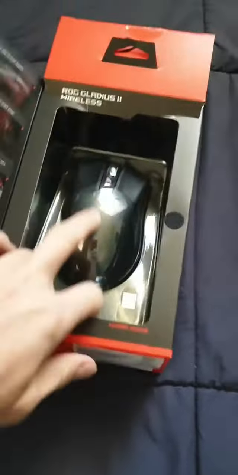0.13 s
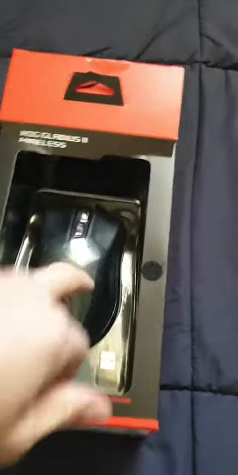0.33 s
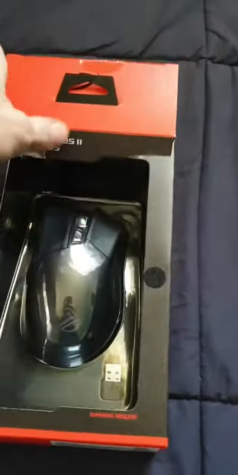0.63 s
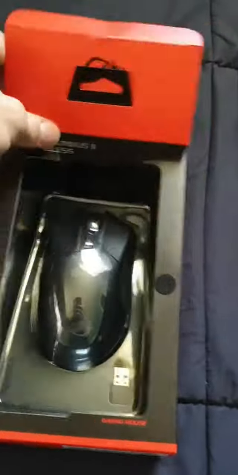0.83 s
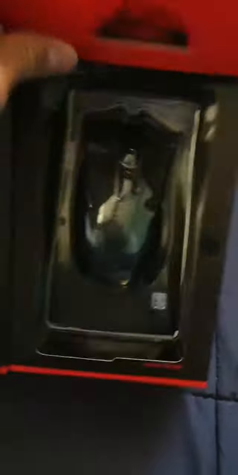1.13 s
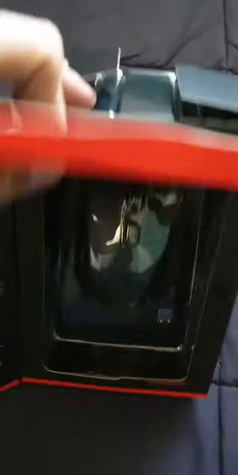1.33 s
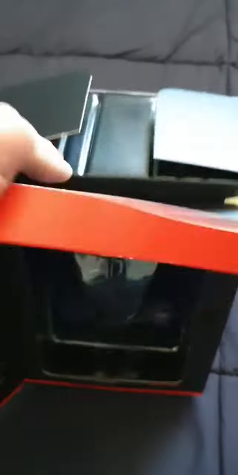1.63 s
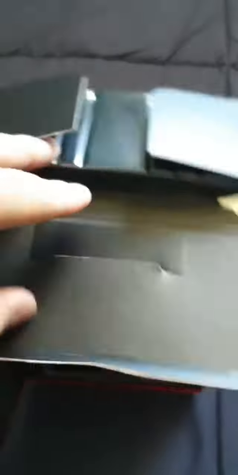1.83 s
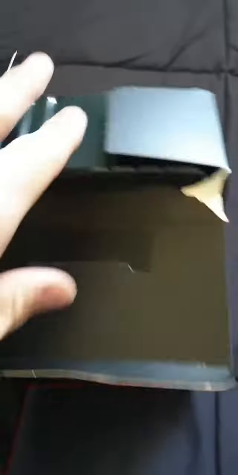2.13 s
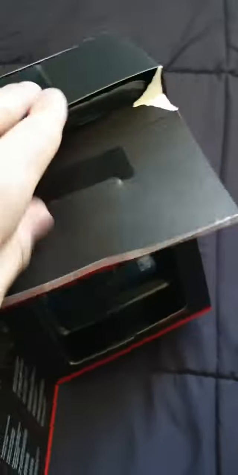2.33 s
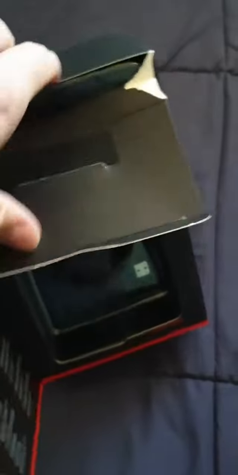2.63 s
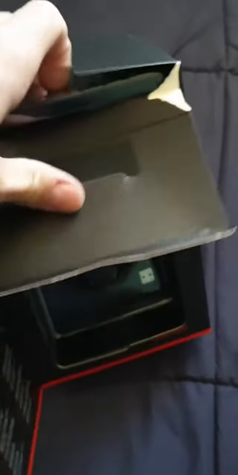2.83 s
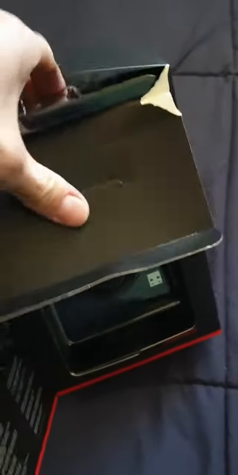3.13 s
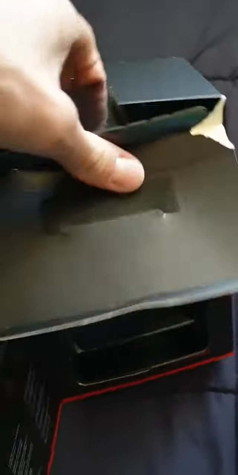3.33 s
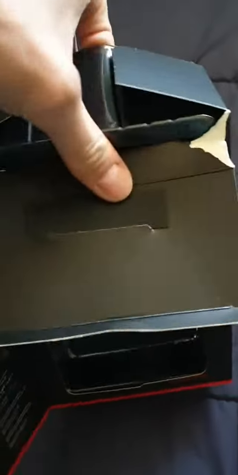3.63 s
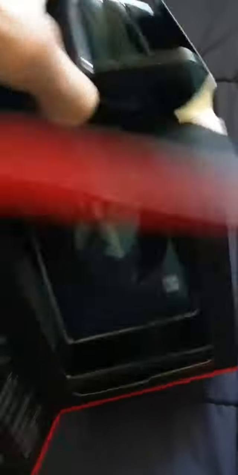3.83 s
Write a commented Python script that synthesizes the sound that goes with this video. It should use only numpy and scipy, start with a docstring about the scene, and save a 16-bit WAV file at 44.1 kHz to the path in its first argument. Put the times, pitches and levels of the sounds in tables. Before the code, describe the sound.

Cardboard box being opened by hand, with papery scrapes, hollow knocks and sharp crackling snaps

```python
"""Opening a small cardboard box

A hand opens a small cardboard box on a quilt, close to a phone with two spaced microphones.
Fingers and flaps scrape the card: random stick-slip grains, filtered to a hollow rasp and a papery hiss.
Flap edges and a plastic tray crack in flurries of snaps, over duller ticks of fingertips and card edges.
Knocks ring the modes of the hollow box, its big panels thump, and it rumbles as it shifts on the quilt.
A small soft room rings briefly, over a faint hiss of quiet room and microphones."""
import sys
import numpy as np
from scipy import signal
from scipy.fft import rfft, irfft
from scipy.io import wavfile
from scipy.ndimage import uniform_filter1d

SR = 44100
rng = np.random.default_rng(int(sys.argv[2]) if len(sys.argv) > 2 else 0)


def pcm_store(signal):
    """Save signal as 16-bit PCM."""
    levels = np.round(np.clip(np.atleast_2d(signal), -1, 1) * 32767)
    wavfile.write(sys.argv[1], SR, levels.astype(np.int16).T)


def boost(x):
    """Linear amplitude factor 10**(x/20) for a level x in decibels (scalar or array-like)."""
    u = np.asarray(x, float) / 20
    return 10 ** u


N = 176400  # samples in the scene


def unit(x):
    """Normalisation: scales a signal to an rms of 1."""
    return x / np.sqrt(np.mean(x ** 2))


def unit_energy(x):
    """Normalisation: scales a signal to a total energy of 1."""
    return x / np.linalg.norm(x)


def shape(table, size):
    """Spectral interpolation: gain at each FFT bin, linear in dB over log frequency."""
    hz, db = np.array(table, float).T
    bins_hz = np.fft.rfftfreq(size, 1 / SR)
    return boost(np.interp(np.log(bins_hz + 1), np.log(hz + 1), db))


def colour(x, table):
    """Minimum-phase filtering: folding the cepstrum makes a causal filter of the given spectrum."""
    cepstrum = irfft(np.log(shape(table, size=8192)))
    cepstrum[1:4096] *= 2
    cepstrum[4097:] = 0
    response = irfft(np.exp(rfft(cepstrum)))
    return signal.fftconvolve(x, response)[:N]


def band(x, lo_hz, hi_hz):
    """Band-pass filtering: a Butterworth filter keeps the range between two cutoffs."""
    edges = [lo_hz, min(hi_hz, .45 * SR)]
    return signal.sosfilt(signal.butter(2, edges, "band", fs=SR, output="sos"), x)


def walk(rate):
    """Sample and hold: random levels held 1 / rate s and slewed; spread near 1."""
    hold = int(SR / rate)
    steps = np.repeat(rng.standard_normal(N // hold + 1), hold)
    return uniform_filter1d(steps, hold // 2 + 1)[:N]


def add(out, s, x):
    """Superposition: mixes a sound in at s seconds."""
    i = int(s * SR)
    out[i:i + len(x)] += x[:N - i]


def stick_slip(grains_per_s, size_db, uneven, slip, spectrum):
    """Stick-slip friction: random impulses of uneven size, stepped in level, excite a filter; rms 1."""
    slip_db, flicker_db = 2.06, 2.03  # each multiplied by uneven
    chance, sign, size = rng.random((3, N))
    grains = (chance < grains_per_s / SR) * np.sign(sign - .5)
    grains = grains * boost(-size_db * np.log(1 - .995 * size))  # exponential spread in dB, with a ceiling
    grains = grains * boost(uneven * (slip_db * slip + flicker_db * walk(50)))
    return unit(colour(grains, spectrum))


# strokes of fingers and flaps over the card
# (start t/s, swell/s, end t/s, hollow rasp level/dB, papery hiss level/dB)
STROKES = [(0, 0.025, .17, -54, -55), (.18, 0.022, 0.26, -63, -63), (0.287, 0.048, 0.39, -42.5, -50),
           (0.694, 0.054, 0.88, -58, -60), (.84, 0.06, 0.94, -59.5, -54), (.96, 0.043, 1.32, -57.5, -58),
           (1.038, 0.0034, 1.14, -45, -55), (1.214, 0.0027, 1.34, -51.5, -56),
           (1.33, 0.066, 1.483, -60.5, -51), (1.469, 0.056, 1.56, -56, -50.5),
           (1.57, 0.042, 1.66, -58.5, -56), (1.699, 0.0091, 1.8, -54.5, -53),
           (1.834, .001, 1.936, -40, -48.5), (1.968, 0.027, 2.16, -47, -58),
           (2.08, 0.09, 2.22, -50.5, -54.5), (2.24, 0.052, 2.44, -55.5, -57.5),
           (2.458, 0.0052, 2.63, -47, -49), (2.639, 0.031, 2.9, -53.5, -55),
           (2.928, 0.025, 3.09, -44, -55.5), (3.049, 0.19, 3.226, -43, -45.5),
           (3.226, 0.0049, 3.26, -45.5, -51), (3.286, 0.0019, 3.37, -36.5, -44),
           (3.387, 0.0012, 3.422, -34, -35.5), (3.439, 0.049, 3.75, -52.5, -59),
           (3.766, 0.018, 3.84, -43.5, -45.5), (3.857, 0.02, 3.93, -48, -55.5)]
# spectrum of the hollow rasp (f/Hz, relative level/dB)
RASP = [(280, -12), (450, -7.5), (620, 2), (1400, -8), (3200, -11), (6000, -36)]
# spectrum of the papery hiss (f/Hz, relative level/dB)
HISS = [(1500, -34), (3500, -1), (7500, -1.5), (8800, -9), (13000, -1), (16000, -17.5)]


def scrape(slip):
    """Stick-slip friction: each stroke swells, holds and lets go, ringing the card as rasp and hiss."""
    swell_db, release_db_per_s = 15.5, 462
    t = np.arange(N) / SR
    start, swell, end, rasp_db, hiss_db = np.array(STROKES).T[:, :, None]
    rise_db = np.minimum(swell_db * ((t - start) / swell - 1), 0)
    fall_db = release_db_per_s * np.maximum(t - end, 0)
    stroke = boost(rise_db - fall_db)
    # strokes that overlap add in power
    rasp_level = np.linalg.norm(stroke * boost(rasp_db), axis=0)
    hiss_level = np.linalg.norm(stroke * boost(hiss_db), axis=0)
    rasp = stick_slip(1500, 3.0, 1.0, slip, RASP) * rasp_level
    hiss = stick_slip(3500, 2.5, .8, slip, HISS) * hiss_level
    return rasp + hiss


def flurry(hz, db, air_db):
    """Fracture noise: tiny snaps build and die around one resonance, with broad air on top."""
    wide = 0.49  # half-width of the resonance as a fraction of its frequency
    rise_s = 0.001022
    t = np.arange(SR // 20) / SR
    snaps = rng.standard_normal(len(t)) * boost(2.0 * rng.exponential(size=len(t)))
    tone = unit(band(snaps, hz / (1 + wide), hz * (1 + wide)))
    tone = tone + boost(air_db) * unit(band(snaps, 810, 14900))
    burst = unit_energy(t ** 2 * np.exp(-t / rise_s) * tone)
    # the energy of a steady level of db lasting rise_s
    return rise_s, boost(db) * burst * np.sqrt(rise_s * SR)


# cracks of flap edges and plastic tray, each begun one rise time before t
# (t/s, level/dB of the energy spread over one rise time, resonance f/Hz)
CRACKS = [(1.05, -23, 4100), (1.0796, -22.5, 1690), (1.259, -26.5, 3580), (1.292, -28.5, 4170),
          (2.9715, -24, 2800), (2.98, -27.5, 2620), (3.0228, -27, 6993), (3.0907, -38.5, 6600),
          (3.291, -15, 4800), (3.2956, -10, 5200), (3.3307, -26.5, 5900), (3.3918, -21, 3700),
          (3.4156, -14, 5100), (3.7691, -23, 2292)]


def cracks():
    """Fracture noise: edges and tray snap in bursts, each around its own resonance."""
    out = np.zeros(N)
    for s, db, hz in CRACKS:
        rise_s, burst = flurry(hz, db, air_db=2)
        add(out, s - rise_s, burst)
    return out


# duller ticks of fingertips and card edges, each begun one rise time before t
# (t/s, level/dB of the energy spread over one rise time)
TICKS = [(0.1436, -39), (0.7829, -39), (0.812, -42.5), (0.894, -63), (1.54, -41), (1.643, -42),
         (1.7146, -50), (1.743, -25.5), (1.7461, -25), (1.834, -38.5), (1.9132, -33), (2.1359, -37),
         (2.318, -45), (2.351, -46.5), (2.396, -42), (2.427, -46), (2.47, -34.5), (2.4819, -31.5),
         (2.5786, -36), (3.2292, -50), (3.5643, -38.5), (3.6632, -30)]


def ticks():
    """Fracture noise: bursts of the same form share one resonance, with less air."""
    out = np.zeros(N)
    for s, db in TICKS:
        rise_s, burst = flurry(2300, db, air_db=-10)
        add(out, s - rise_s, burst)
    return out


def ring(modes, push_s):
    """Modal synthesis: decaying sines (Hz, dB, t60 s) smoothed by a Hann-shaped push; peak 1."""
    t = np.arange(int(.2 * SR)) / SR
    y = sum(boost(db - 60 * t / t60) * np.sin(2 * np.pi * hz * t) for hz, db, t60 in modes)
    y = np.convolve(y, np.hanning(int(push_s * SR) + 3))[:len(t)]
    y = band(y, 45, 8000)
    return y / np.abs(y).max()


# knocks on the hollow box (t/s, peak level/dB)
KNOCKS = [(0.062, -37.5), (0.144, -30), (1.08, -23.5), (1.217, -38), (1.342, -31.5), (1.98, -30),
          (1.999, -24.5), (2.481, -30.5), (2.58, -21), (3.001, -27.5), (3.021, -36), (3.418, -18.5),
          (3.529, -30.5), (3.564, -23), (3.604, -29.5), (3.662, -23)]
# modes of the hollow box before each knock varies them (mean f/Hz, mean level/dB, t60/s)
BOX = [(659, 16, 0.034), (600, -23, 0.036), (921, -7, 0.05), (1132, 2, 0.032)]


def knocks():
    """Modal excitation: each knock rings the box modes, with pitches and levels mixed anew."""
    out = np.zeros(N)
    for s, db in KNOCKS:
        vary = rng.standard_normal((len(BOX), 2))
        modes = [(hz * (1 + .03 * a), mode_db + 3 * b, t60)
                 for (hz, mode_db, t60), (a, b) in zip(BOX, vary)]
        add(out, s, boost(db) * ring(modes, push_s=0.00037))
    return out


# thumps of the big panels (t/s, peak level/dB, lower mode f/Hz)
THUMPS = [(0.583, -43, 117), (1.085, -38.5, 56), (1.253, -35.5, 208), (1.347, -36.5, 162),
          (1.607, -38.5, 99), (2.135, -34, 202), (2.168, -34.5, 139), (2.485, -28.5, 160.5),
          (2.641, -37, 98), (3.078, -36.5, 154), (3.598, -28, 230), (3.654, -30.5, 208),
          (3.816, -36, 123.5)]


def thumps():
    """Plate resonance: a slower push rings two low modes of a big panel."""
    t60_s = 0.1
    out = np.zeros(N)
    for s, db, hz in THUMPS:
        modes = [(hz, 0, t60_s), (hz * 1.512, -9, t60_s)]
        add(out, s, boost(db) * ring(modes, push_s=0.0023))
    return out


# the box shifts on the quilt (t/s, rumble level/dB)
SHIFT = [(0, -77), (.16, -52), (.26, -89), (.4, -61), (.54, -79.5), (.73, -53), (1.0, -60.5), (1.1, -54.5),
         (2.3, -56), (2.7, -49.5), (4, -48.5)]
# spectrum of the rumble (f/Hz, relative level/dB)
RUMBLE = [(25, -50), (50, -7), (160, -1.5), (260, -7), (500, -20.5), (900, -73)]


def rumble(slip):
    """Stick-slip friction: sparse grains filtered to low frequencies follow the shifting of the box."""
    level = boost(np.interp(np.arange(N) / SR, *np.array(SHIFT).T))
    return stick_slip(300, 2.5, 1.3, slip, RUMBLE) * level


def short_echoes(box):
    """Time-varying convolution: random short echo paths, redrawn steadily and crossfaded, blur each side."""
    redraw_s = .06
    left_lead_s, lead_spread_s = .00012, 0.00013
    decay_s, echo_db = 0.0025, -1.5  # echo energy is relative to the direct sound
    hop, direct = int(redraw_s * SR), 16  # samples
    t = np.arange(1024) / SR
    padded = np.pad(box, (hop, 2 * hop))
    fade = signal.get_window("hann", 2 * hop)
    blurred = np.zeros((2, N + 4 * hop + 1024))
    for i in range(0, N + hop, hop):
        noise = rng.standard_normal((3, len(t)))
        lead_s = left_lead_s + lead_spread_s * noise[2, 0]
        right_direct = int(np.clip(direct + SR * lead_s, 0, 40))
        for k, arrival in enumerate((direct, right_direct)):
            echoes = band(noise[k] * np.exp(-t / decay_s), 980, 10300)
            path = boost(echo_db) * unit_energy(echoes)
            path[arrival] += 1
            piece = signal.fftconvolve(padded[i:i + 2 * hop] * fade, path)
            blurred[k, i:i + len(piece)] += piece
    return blurred[:, hop + direct:hop + direct + N]


def room(box):
    """Reverberation: convolution with exponentially decaying noise gives a small soft room."""
    t60_s, room_db, top_hz = 0.2, -14, 7040
    t = np.arange(SR // 3) / SR
    far = band(rng.standard_normal(len(t)), 51, top_hz)
    far = far * boost(-60 * t / t60_s) * (t > .005)
    return boost(room_db) * signal.fftconvolve(box, unit_energy(far))[:N]


# spectrum of the quiet room and microphone hiss (f/Hz, relative level/dB)
AIR = [(30, 0), (8000, -19), (16000, -23)]


def air():
    """Stationary noise: filtered Gaussian noise gives the quiet room and microphone hiss."""
    return boost(-74) * unit(colour(rng.standard_normal(N), AIR))


# spectral balance of the two microphones (f/Hz, left minus right level/dB)
EARS_DB = [(200, 1), (900, 5.5), (2800, -0.5), (8000, 2.5)]


def scene():
    """Superposition: each microphone hears the box direct, by short echoes and through the room, plus hiss."""
    slip = walk(90)  # the grip slips in steps shared by all friction
    box = scrape(slip) + cracks() + ticks() + knocks() + thumps() + rumble(slip)
    blurred = short_echoes(box)
    out = np.zeros((2, N))
    for k, side in enumerate((1, -1)):
        balance = [(hz, side * db / 2) for hz, db in EARS_DB]
        out[k] = colour(blurred[k] + room(box), balance) + air()
    return out


def roll_off(x):
    """The treble ends steeply here."""
    return signal.sosfilt(signal.butter(12, 16670, fs=SR, output="sos"), x)


def record(dry):
    """Stereo capture: the two microphone signals become the finished sound."""
    return roll_off(dry)


dry = scene()
out = record(dry)
pcm_store(out)
```